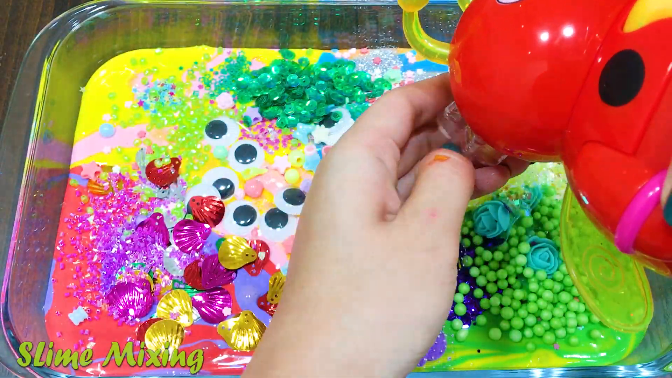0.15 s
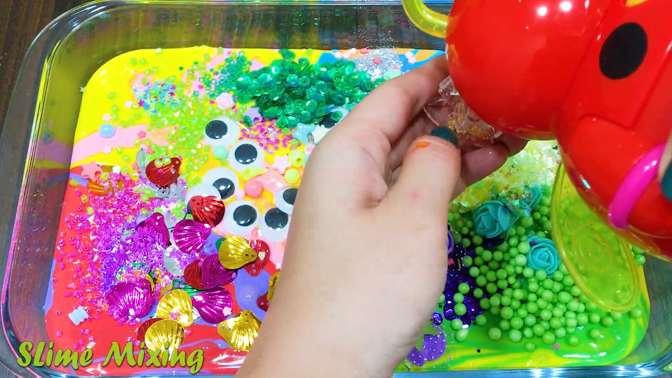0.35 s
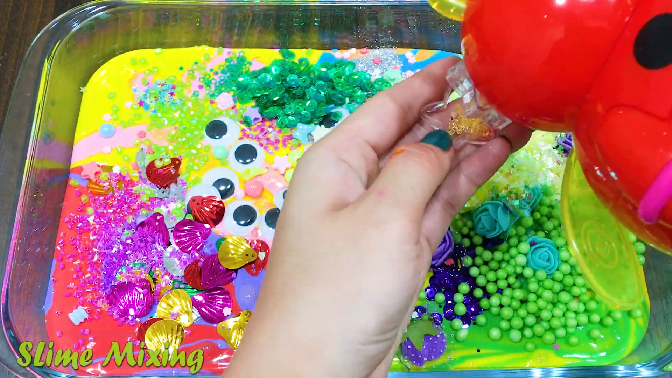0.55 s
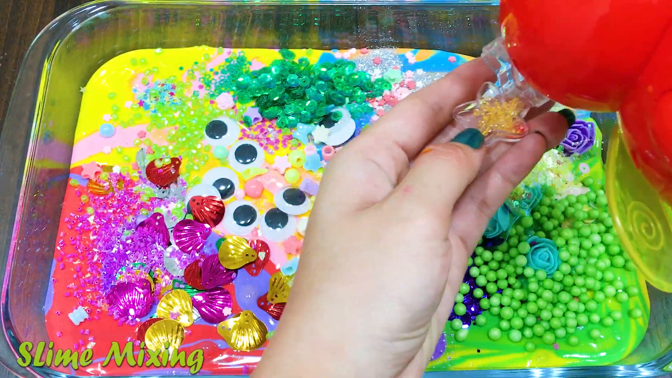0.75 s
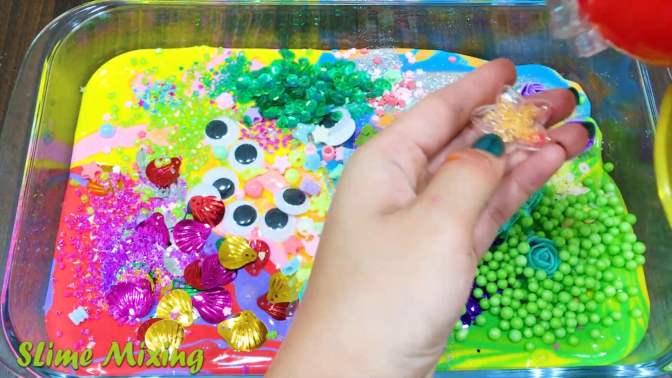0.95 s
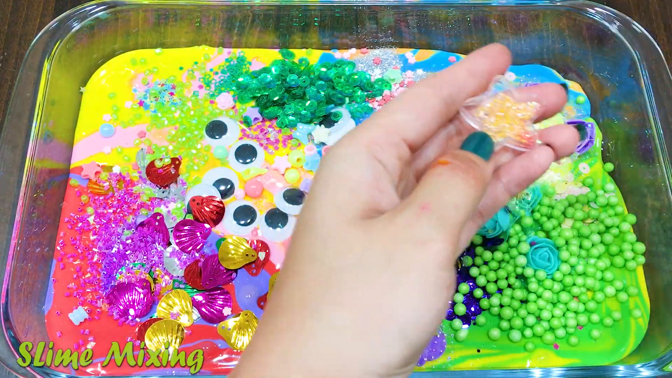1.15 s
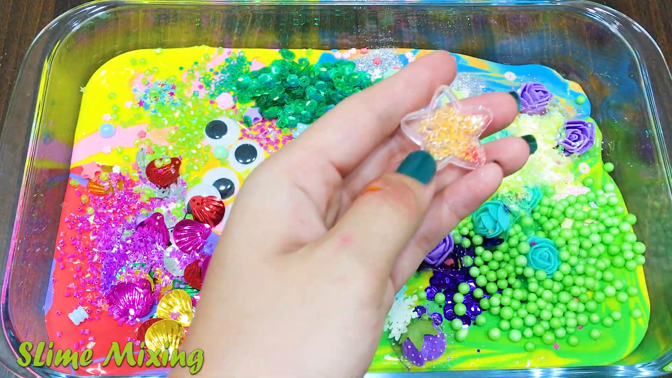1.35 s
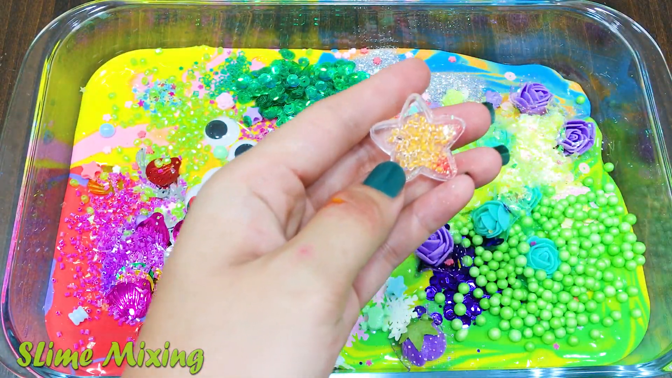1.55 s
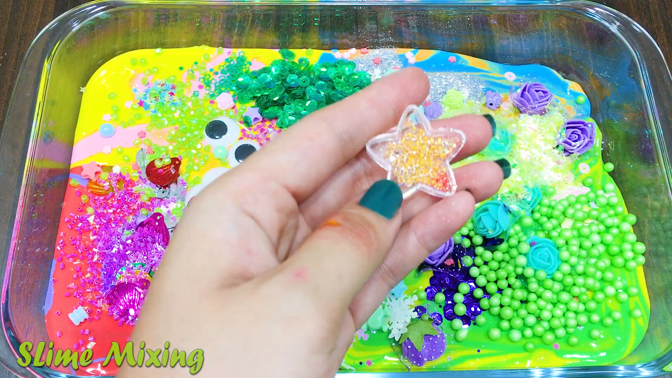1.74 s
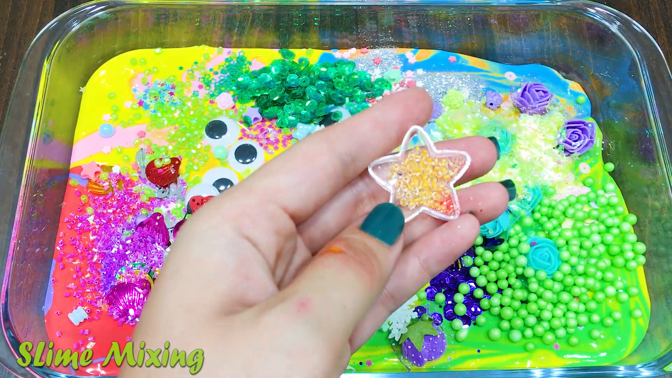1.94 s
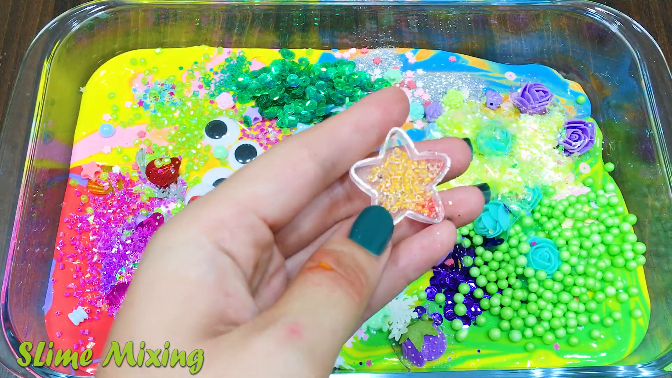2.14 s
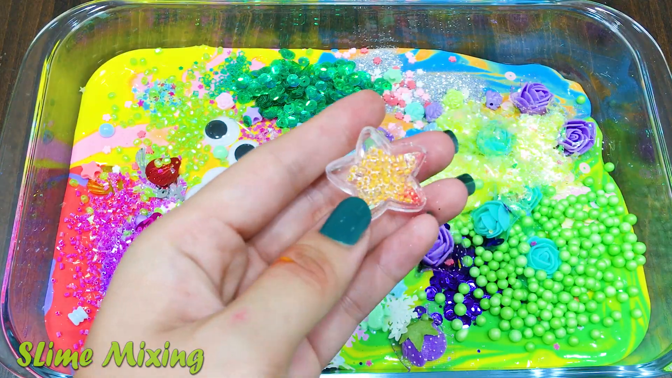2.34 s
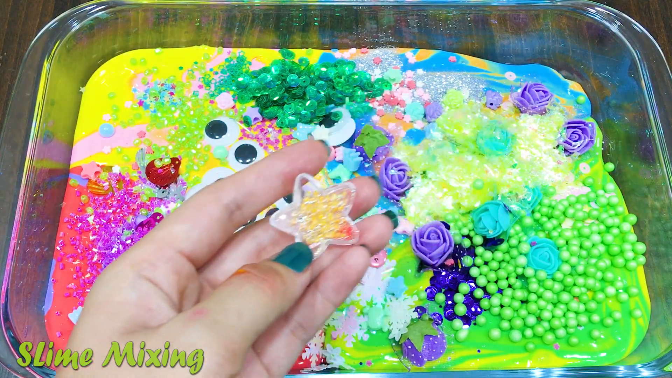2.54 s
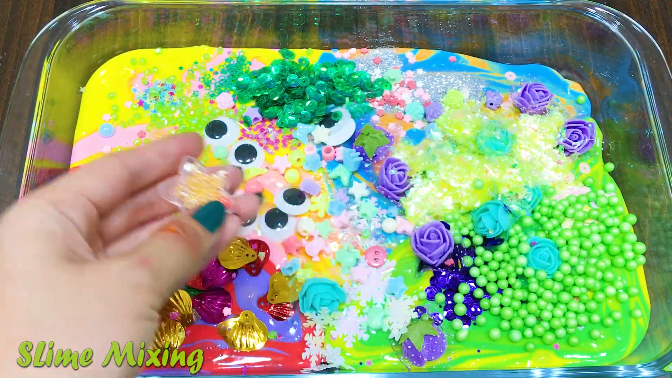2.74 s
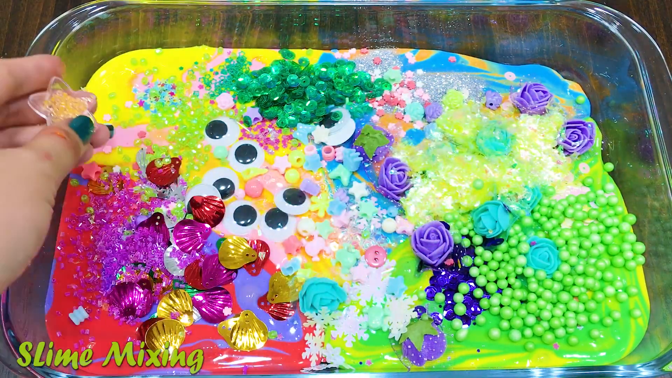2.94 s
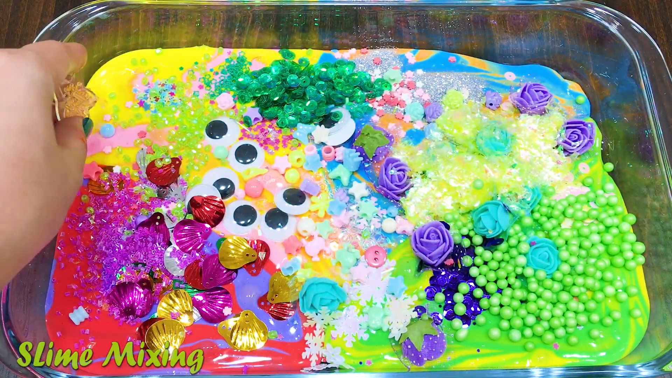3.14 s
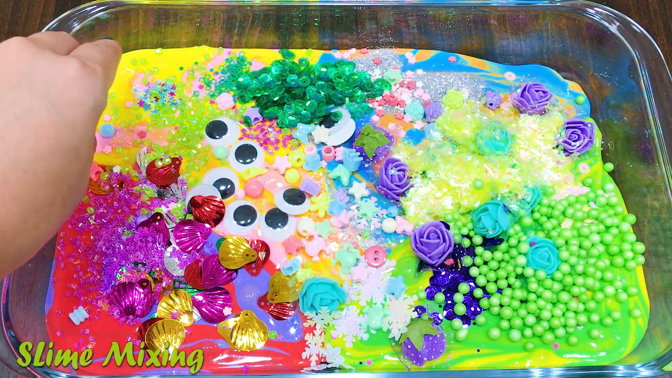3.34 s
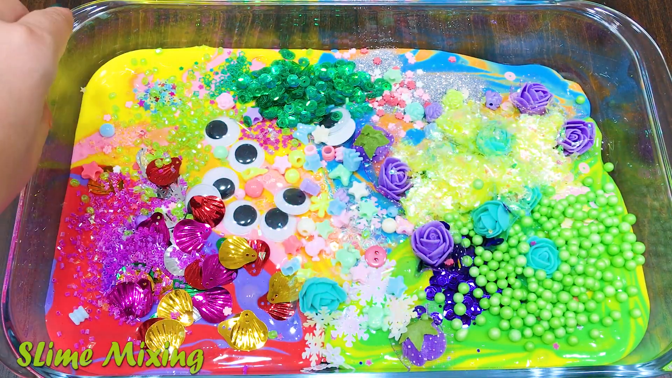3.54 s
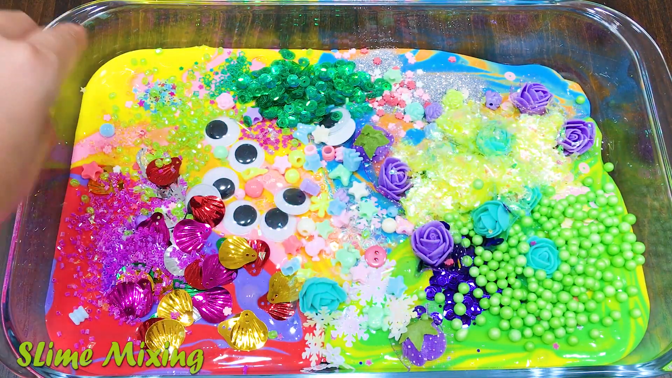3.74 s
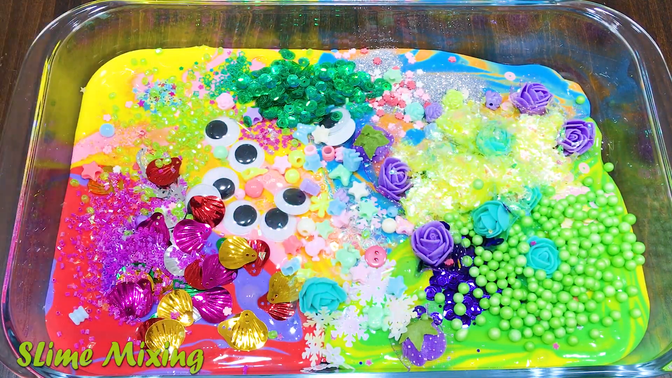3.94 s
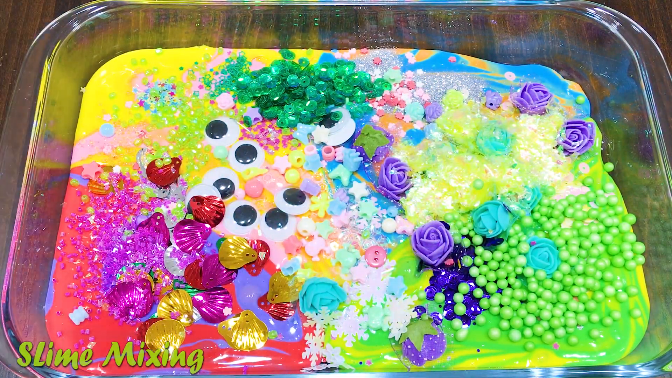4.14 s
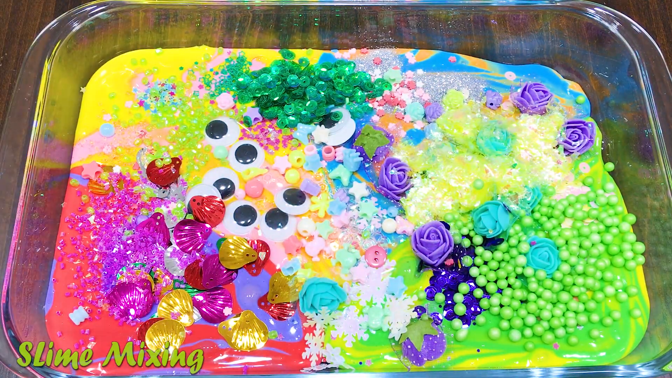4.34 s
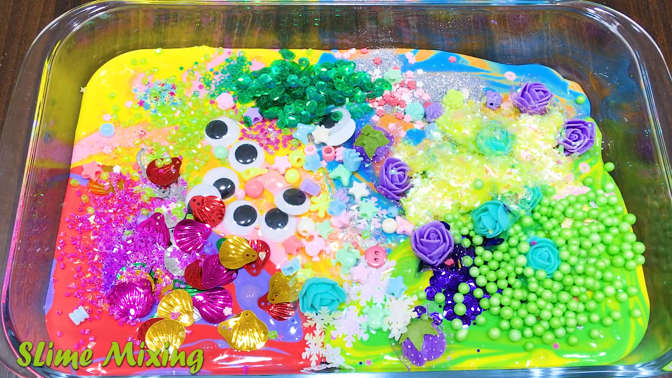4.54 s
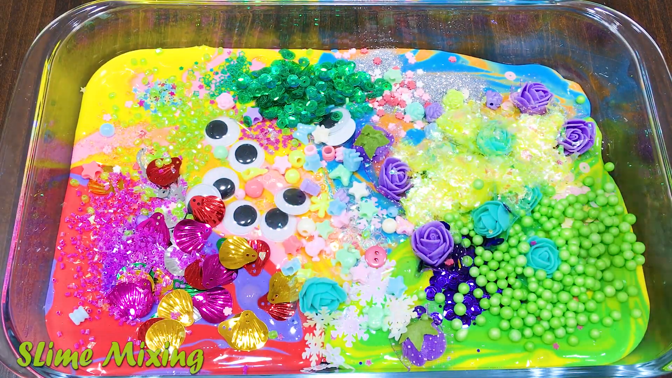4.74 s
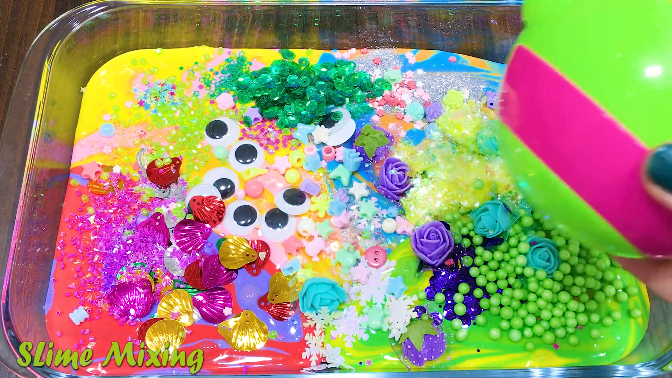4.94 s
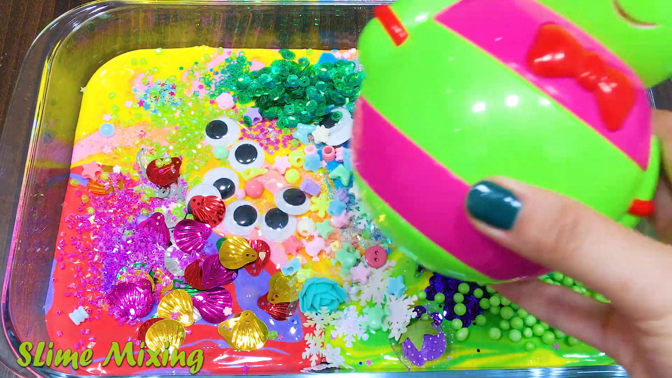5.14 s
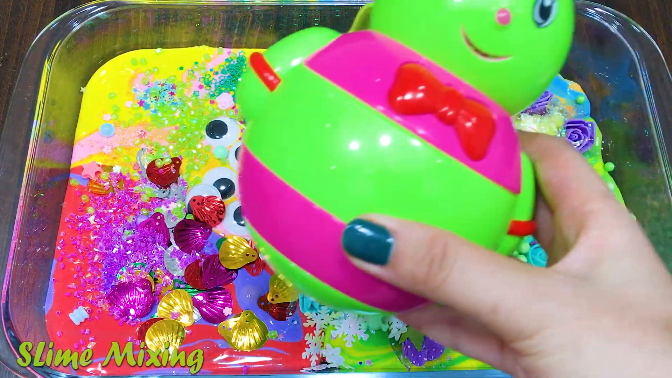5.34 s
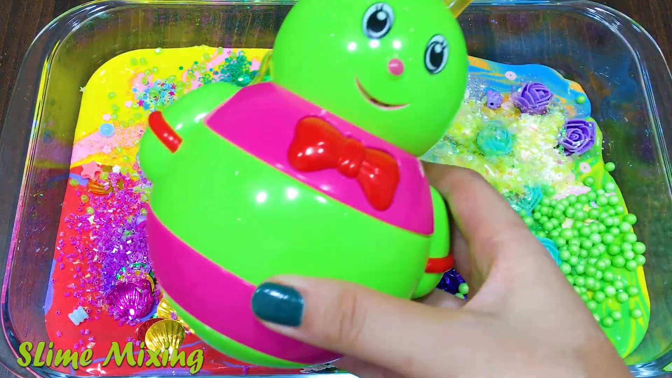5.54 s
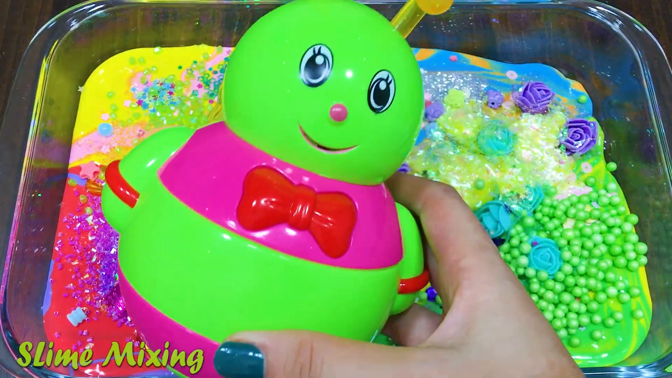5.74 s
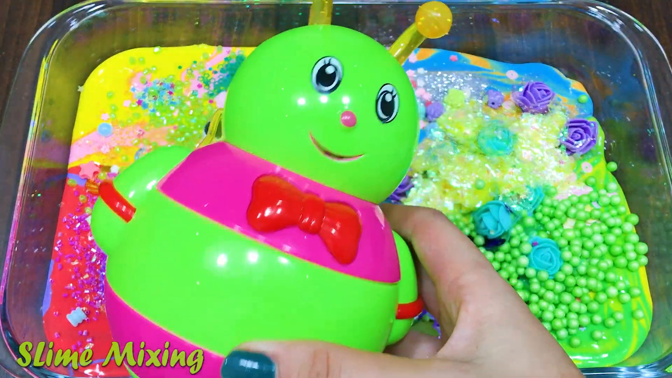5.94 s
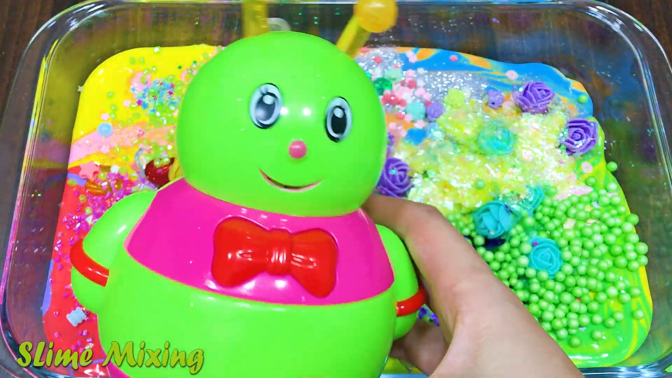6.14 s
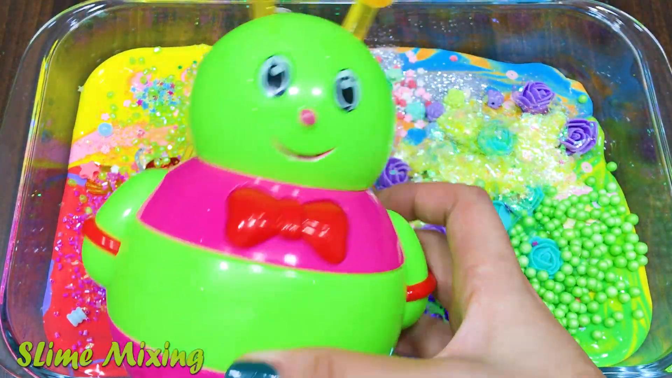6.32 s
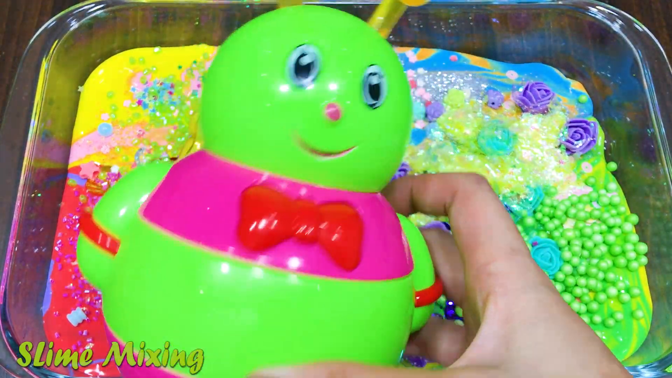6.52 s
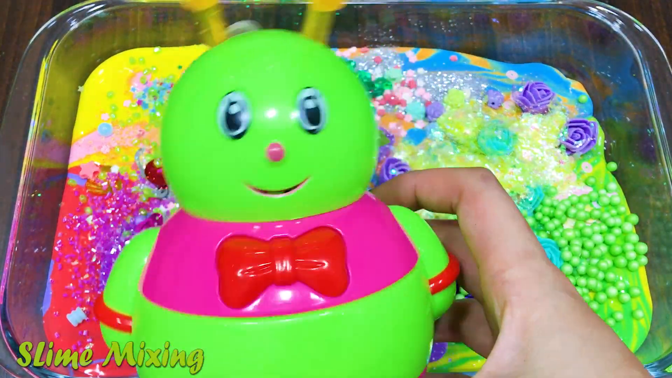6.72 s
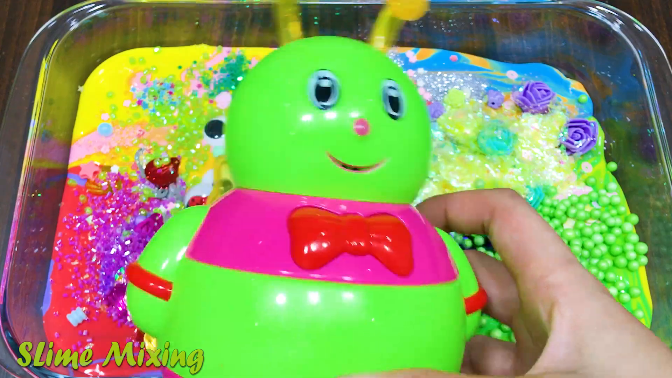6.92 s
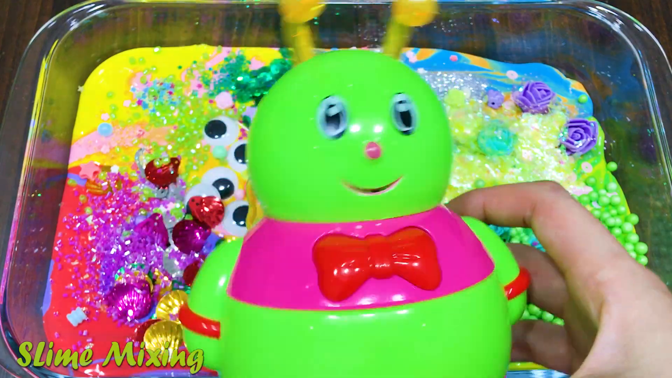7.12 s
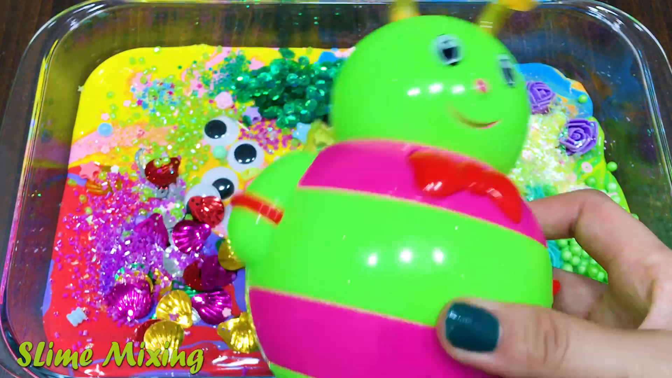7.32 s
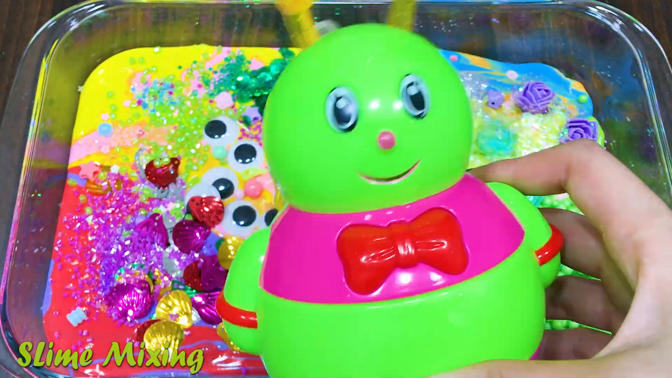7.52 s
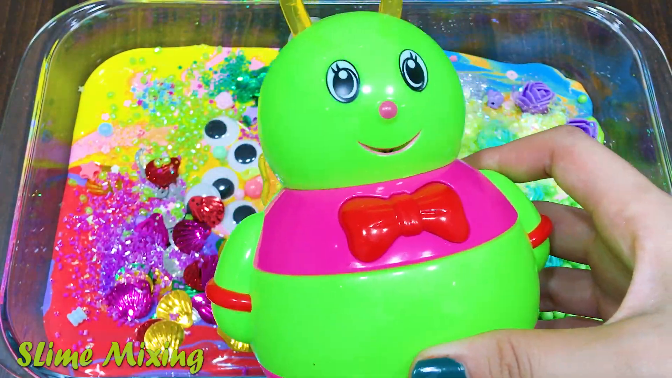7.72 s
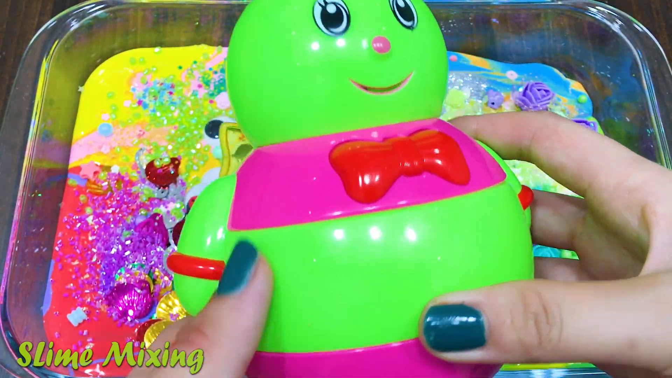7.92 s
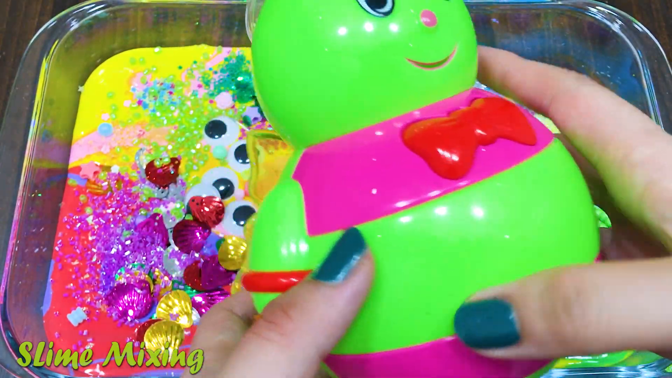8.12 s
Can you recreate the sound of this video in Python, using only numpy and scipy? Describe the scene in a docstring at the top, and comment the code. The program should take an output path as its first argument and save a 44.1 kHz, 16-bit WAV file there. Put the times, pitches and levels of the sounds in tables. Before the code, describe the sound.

Close indoor handling of plastic toys over slime: clicks and ticking beads, sparse bumps, a crinkly little box, clattering shells, then a loud hollow rattle.

```python
"""Plastic toys over slime

Hollow plastic toys are handled over a glass tray of slime, close by in a quiet room. A red toy clicks open,
beads plop and patter, the toy is put down, and a star-shaped box crackles; toys clack and a green one rattles.
Touches are noise bursts through resonant shells; patter, crackle and rubbing are streams of tiny impacts.
Slime thuds are falling sines, ringing parts are decaying sines, and diffuse reflections surround the toys."""
import sys
import numpy as np
from scipy import signal
from scipy.fft import rfft, irfft
from scipy.io import wavfile

SR = 44100
rng = np.random.default_rng(int(sys.argv[2]) if len(sys.argv) > 2 else 0)


def to_wav(sig):
    """Store sig (one row per channel, or 1-D mono) as 16-bit WAV at the path in sys.argv[1].

    Samples outside -1..1 are clipped; the rate is SR.
    """
    pcm = np.clip(np.atleast_2d(sig), -1, 1) * 32767
    pcm = np.round(pcm).astype(np.int16)
    wavfile.write(sys.argv[1], SR, pcm.T)  # frames by channels


N = 360297

# Touch levels below are set before the treble lift and dulling; the dB of colours and resonances are relative.
# Still air. Each row: frequency in Hz, relative level in dB per Hz.
AIR_COLOUR = [(15, -68), (25, -41), (55, -4.5), (130, -7.5), (161, -10.5), (285, -14), (695, -21.5),
              (796, -21), (1100, -26), (9840, -34.5), (12200, -33.5), (16000, -39)]
# Swell of the hum. Each row: time in seconds, RMS level in dB.
HUM_SWELL = [(0, -72), (3.2, -78), (3.7, -66.5), (4.6, -70), (6, -73.5), (7.6, -75), (7.9, -66.5)]
# Decay of the room. Each row: frequency in Hz, time to fall 60 dB in seconds.
ROOM_DECAY = [(200, .6), (1000, 0.93), (3000, 0.8), (7000, .5), (11000, .5), (16000, .3)]
# Strength of the reverberation. Each row: frequency in Hz, level in dB before each source's send.
ROOM_LEVEL = [(200, -9), (1000, 2), (3000, -6), (7000, -6), (11000, -10.5), (16000, -16)]

# Fingers rub the red toy. Each row: start in seconds, length in seconds, level in dB.
RED_RUBS = [(-.02, 0.21, -54), (.7, 0.011, -57.5), (1.23, 0.13, -56)]
# Hollow of the rubbed red toy. Each row: centre in Hz, half-width in Hz, relative level in dB.
RED_CAVITY = [(1506, 340, -6.5), (2830, 500, -8.5), (4870, 2050, 2.5)]
# The red toy's mouth clicks as the box is pried out.
# Each row: start in seconds, level in dB, time to the first rebound in seconds, number of touches.
RED_CLICKS = [(.0508, -43, 0.03, 2), (.0962, -40, 0, 1), (.1161, -32, 0.011, 3), (.1461, -29, 0, 1),
              (.1685, -30, 0, 1), (.2308, -34.5, .014, 2), (.253, -42, 0, 1)]
# The red toy is put down.
# Each row: start in seconds, level in dB, time to the first rebound in seconds, number of touches.
RED_BUMPS = [(1.2426, -40, .0088, 3), (1.2986, -43, .012, 2), (1.3439, -39.5, .0081, 2),
             (1.4308, -49, 0, 1), (1.4891, -31, .0175, 2), (1.6969, -48, 0, 1)]
# Broad colour of the red toy. Each row: frequency in Hz, relative level in dB per Hz.
RED_COLOUR = [(240, -66), (400, -29), (852, -35), (1460, -27), (2710, -14.5), (3020, -7), (3930, -12),
              (6440, 0), (10100, -16), (16000, -22)]
# Its shell as it clicks. Each row: frequency in Hz, width in Hz, dB added to the colour.
RED_CLICK_MODES = [(1503, 110, 10), (3580, 430, -17), (6000, 720, 0), (7000, 440, 3), (7700, 310, 2)]
# Its shell as it is put down. Each row: frequency in Hz, width in Hz, dB added to the colour.
RED_BUMP_MODES = [(1570, 180, 5.4), (2150, 480, 4), (3500, 380, 0.96), (4500, 570, 2.7), (6260, 340, 2.3),
                  (8800, 900, 3.6)]

# Soft landings in the slime. Each row: start in seconds, thud level in dB, final pitch in Hz, splat level in dB.
LANDINGS = [(0.059, -44.5, 206, -47), (.312, -41, 68, -32.5), (0.882, -72, 302.5, -57.5),
            (0.968, -56.5, 278, -62.5), (1.162, -53.5, 260, -62), (6.07, -56, 152, -54)]
# Colour of the splat. Each row: frequency in Hz, relative level in dB per Hz.
SPLAT_COLOUR = [(150, -10), (400, -6), (900, -3.5), (1800, 4), (3000, -5), (7000, -14.5), (16000, -12)]

# Spills of beads. Each row: start in seconds, length in seconds, level in dB.
BEAD_SPILLS = [(.335, 0.053, -45.5), (.445, .025, -48), (.68, 0.14, -58), (.81, 0.17, -53),
               (1.08, 0.14, -65)]
# Beads that land hard. Each row: start in seconds, level in dB.
HARD_BEADS = [(.3817, -39), (.3905, -54), (.4012, -42), (.4127, -41.5), (.7301, -61), (.8696, -51),
              (.9552, -49), (1.1021, -52.5)]
# Colour of the beads. Each row: frequency in Hz, relative level in dB per Hz.
BEAD_COLOUR = [(2500, -32), (7000, -22), (9500, -16), (11600, -5), (13500, -13.5), (16000, -15)]

# Sharp snaps of the star box. Each row: start in seconds, level in dB.
BOX_SNAPS = [(2.7184, -61), (3.3169, -53), (3.3283, -39), (3.3748, -52), (3.3983, -50), (3.4366, -45.5),
             (3.4907, -40.5), (3.5114, -51), (3.556, -41.5)]
# Fingers squeeze the star box. Each row: start in seconds, length in seconds, level in dB.
BOX_SQUEEZES = [(3.16, 0.17, -58.5), (3.3, .31, -56), (4.535, 0.028, -53)]
# The star box slides. Each row: start in seconds, length in seconds, level in dB.
BOX_SLIDES = [(3.31, .32, -65)]
# Broad colour of the box. Each row: frequency in Hz, relative level in dB per Hz.
BOX_COLOUR = [(710, -45), (1200, -16), (1830, -24.5), (3400, -10.5), (3660, -17), (4220, -9), (6230, -10.5),
              (8170, 0), (10100, -3), (12500, 1), (16000, -2.5)]
# Shell of the box. Each row: frequency in Hz, width in Hz, dB added to the colour.
BOX_MODES = [(2000, 1000, 13), (3500, 250, 3.5), (5720, 170, 2.6)]
# Hollow of the sliding box. Each row: centre in Hz, half-width in Hz, relative level in dB.
BOX_CAVITY = [(700, 127, -0.8), (1950, 300, 0.35)]

# Toys clack together as the green one is picked out. Each row: start in seconds, level in dB.
TOY_CLACKS = [(4.2866, -43.5), (4.3336, -41.5), (4.3683, -36.5), (4.653, -35), (4.6781, -21.5),
              (4.6921, -31.5), (4.7126, -33), (4.7277, -28.5), (4.7545, -39), (4.7651, -26.5),
              (4.8605, -29), (4.8828, -30.5), (4.8957, -31.5)]
# Colour of shell on shell. Each row: frequency in Hz, relative level in dB per Hz.
CLACK_COLOUR = [(350, -64), (600, -33), (1830, -19.5), (2680, -14), (3430, -5), (3730, -13.5), (5050, -4),
                (6550, -1), (7830, 0), (16000, -17)]
# Resonances of shell on shell. Each row: frequency in Hz, width in Hz, dB added to the colour.
CLACK_MODES = [(1950, 230, 6), (4090, 320, 8), (4700, 260, 8), (7850, 450, 4.5)]

# Fingers rub the green toy. Each row: start in seconds, length in seconds, level in dB.
GREEN_RUBS = [(4.9, 0.19, -61.5), (5.64, .2, -66)]
# Hollow of the rubbed green toy. Each row: centre in Hz, half-width in Hz, relative level in dB.
GREEN_CAVITY = [(2070, 210, -1), (2330, 120, -6)]
# Single knocks as the green toy is lifted and turned. Each row: start in seconds, level in dB.
GREEN_HANDLING = [(4.9827, -38.5), (5.067, -36.5), (5.077, -34), (5.1107, -32.5), (5.1278, -26.5),
                  (5.3685, -50.5), (5.669, -43.5), (5.6914, -33), (5.818, -47.5), (5.8813, -37),
                  (6.1295, -47), (6.149, -35), (6.2267, -43.5), (6.246, -41), (6.273, -34.5), (7.8766, -35),
                  (7.988, -42), (8.0755, -46.5)]
# Shaking throws the loose parts against the shell.
# Each row: start in seconds, level in dB, time to the first rebound in seconds, number of touches.
GREEN_THROWS = [(6.2922, -29.5, .0105, 4), (6.3454, -29.5, .0176, 2), (6.401, -31.5, .009, 2),
                (6.462, -27.5, 0, 1), (6.479, -27, .0137, 3), (6.5518, -27.5, .0036, 2),
                (6.6293, -29.5, .0122, 2), (6.6823, -28, .0165, 3), (6.7269, -27.5, .0221, 2),
                (6.8289, -31.5, 0, 1), (6.843, -25, .0157, 3), (6.9091, -25.5, .0036, 2),
                (6.9289, -28.5, .025, 2), (6.9796, -24, .0211, 2), (7.033, -26.5, .01, 2),
                (7.1097, -23, .007, 2), (7.172, -26, .014, 3), (7.2432, -23, .0225, 3),
                (7.3053, -29.5, .011, 2), (7.3841, -22.5, 0, 1), (7.4228, -26, .0116, 3),
                (7.5071, -21.5, .0135, 3), (7.5465, -25.5, .018, 2), (7.5765, -23, .0033, 2),
                (7.6276, -22.5, .0095, 2), (7.6542, -22, .008, 2), (7.6871, -22.5, .019, 3),
                (7.7513, -27.5, .0217, 2), (7.7928, -26, 0, 1)]
# Vigour of the shaking, before the chatter trim. Each row: time in seconds, level in dB.
SHAKE_VIGOUR = [(6.1, -73), (6.18, -64), (6.46, -42.5), (6.78, -37.5), (7.06, -29.5), (7.6, -30.5),
                (7.67, -27), (7.95, -57), (8.15, -59.5)]
# Broad colour of the green toy. Each row: frequency in Hz, relative level in dB per Hz.
GREEN_COLOUR = [(210, -46.5), (350, -31), (1680, -14.5), (2000, -8), (2630, -11.5), (2800, -7), (4180, -4),
                (5220, 2.5), (8710, 3), (16000, -11)]
# Shell of the green toy. Each row: frequency in Hz, width in Hz, dB added to the colour.
GREEN_MODES = [(1233, 88, 9), (1997, 66, 5.5), (2410, 180, 7.5), (3100, 850, -2.5), (4480, 71, 6),
               (5240, 38, 5.5), (7170, 290, 2.5), (7480, 270, 0), (8170, 510, 1.5), (10100, 140, 1),
               (15200, 2400, 4.5)]
# Tones of the green toy's parts. Each row: frequency in Hz, level in dB relative to a firm knock,
# time to fall 60 dB in seconds, dB gained per dB of a harder knock, level in dB of a flick of 0 dB.
PART_TONES = [(2787, -22, 0.15, 1.7, -41), (2847, -20, 0.2, 1.8, -39), (3403, -5.5, 0.034, 6.5, -77),
              (6570, -52, 0.13, 3.5, -39)]
# The springy part is flicked directly. Each row: start in seconds, strength in dB.
PART_FLICKS = [(5.129, -2), (5.881, -14.5), (6.147, -19)]
# Sizzle of the flicked part. Each row: frequency in Hz, relative level in dB per Hz.
SIZZLE_COLOUR = [(2000, -51), (5500, -26), (6600, 7), (7600, -11), (9300, -1.5), (10200, -33), (16000, -18)]

AIR_DB, HUM_HZ = -66, 131.6
CHATTER_DB = -7.5       # trim of the light touches against the vigour
FIRM_KNOCK_DB = -22     # reference knock for the ringing parts
REBOUND_SHARE = .75     # each rebound takes this share of the time of the one before
CONTACT_S = .0045       # a touch's level is its RMS as if spread over this time
CUTOFF_HZ = 15800
SIZE = 4096             # samples in a short sound
GRID_HZ = np.maximum(np.arange(SIZE // 2 + 1) * SR / SIZE, 1)
AGE = np.arange(SIZE) / SR
TIME = np.arange(N) / SR


def from_db(db):
    """Turn decibels into an amplitude factor."""
    return 10 ** (np.asarray(db) / 20)


def rms_one(x):
    """Scale a sound to an RMS of one."""
    return x / np.sqrt(np.mean(x ** 2) + 1e-20)


def at_hz(points, hz):
    """Read a table on a log-frequency axis."""
    table = np.array(points)
    return np.interp(np.log(hz), np.log(table[:, 0]), table[:, 1])


def in_time(rows):
    """Read a level curve at every sample."""
    s, level = np.transpose(rows)
    return np.interp(TIME, s, level)


def add(out, s, sound):
    """Mix a short sound in at time s."""
    at = max(round(s * SR), 0)
    out[at:at + len(sound)] += sound[:N - at]


def through(x, response):
    """Pass a sound through a body or room, keeping its length."""
    return signal.fftconvolve(x, response)[:len(x)]


def band_of(x, low, high):
    """Keep only the band between two frequencies in Hz."""
    return signal.sosfilt(signal.butter(2, [low, high], "band", fs=SR, output="sos"), x)


def body_db(colour, resonances=()):
    """A body's gain by frequency: a broad colour with resonances laid over it."""
    gain_db = at_hz(colour, GRID_HZ)
    for hz, width, db in resonances:
        gain_db = gain_db + db / (1 + (2 * (GRID_HZ - hz) / width) ** 2)
    return gain_db


def impulse(gain_db):
    """The causal (minimum-phase) response that has these gains."""
    cepstrum = irfft(np.log(from_db(gain_db)))
    cepstrum[1:SIZE // 2] *= 2
    cepstrum[SIZE // 2 + 1:] = 0
    return irfft(np.exp(rfft(cepstrum)))


def contact(gain_db, grind_s, skid_db, skid_s, lift_db=0):
    """One touch: a brief burst of micro-impacts and a weaker skid, sounding through a body."""
    phase = AGE / (grind_s * from_db(rng.normal(0, 1.5)))   # no two bursts last equally long
    burst = phase ** .5 * np.exp(-phase ** 2)
    skid = from_db(skid_db) * np.exp(-AGE / skid_s)
    force = rng.standard_normal(SIZE) * (burst + skid)
    energy = np.mean(np.abs(rfft(force) * from_db(gain_db)) ** 2)   # leaves the lift out
    return through(force, impulse(gain_db + lift_db)) / np.sqrt(energy / (CONTACT_S * SR))


def knocks(rows, gain_db, grind_s, skid_db, skid_s, treble_db, firm_db, dulling):
    """Touches that dull the further they fall below a firm one: the direct sound, and the room's share."""
    direct, spread = np.zeros((2, N))
    treble = 1 / (1 + (8000 / GRID_HZ) ** 6)
    modes_hz = np.arange(0, SR / 2, 350)
    unit = np.sqrt(CONTACT_S * SR / np.mean(from_db(gain_db) ** 2))
    for s, level_db in rows:
        lift_db = (treble_db - dulling * max(firm_db - level_db, 0)) * treble
        # each spot struck aims other modes at the microphone; the room's share keeps the even colour
        spot_db = np.interp(GRID_HZ, modes_hz, rng.normal(0, 3.5, len(modes_hz)))
        touch = contact(gain_db + spot_db, grind_s, skid_db, skid_s, lift_db)
        add(direct, s, from_db(level_db) * touch)
        add(spread, s, from_db(level_db) * unit * impulse(gain_db + lift_db))
    return np.array([direct, spread])


def rebounds(rows, loss_db):
    """Each blow bounces, every gap shorter and touch weaker than the last; gives (s, dB) of all touches."""
    touches = []
    for s, db, gap, count in rows:
        for k in range(count):
            delay = gap * sum(REBOUND_SHARE ** j for j in range(k))
            touches.append((s + delay, db - loss_db * k))
    return touches


def grains(per_s, spread_db):
    """Tiny impacts at random moments, most weak and a few strong."""
    sizes = from_db(spread_db * np.minimum(rng.exponential(1, N), 3.5))
    signs = rng.choice([-1, 1], N)
    return sizes * signs * (rng.random(N) < per_s / SR)


def gestures(rows, attack_s, release_s):
    """Gain of hand movements that swell, hold and die away."""
    gain = np.zeros(N)
    for s, length, db in rows:
        swell = np.clip((TIME - s) / attack_s, 0, 1)
        release = np.exp(-np.maximum(TIME - s - length, 0) / release_s)
        gain += from_db(db) * swell * release
    return gain


def rub(gain, resonances):
    """A stream of tiny slips sounds a hollow body's resonances."""
    slips = grains(per_s=1500, spread_db=3) + 1e-18
    rings = sum(from_db(db) * rms_one(band_of(slips, hz - width, hz + width)) for hz, width, db in resonances)
    return gain * rms_one(rings)


def background():
    """Still room air is coloured noise; a faint hum is a sine with slowly wavering phase."""
    hz = np.maximum(np.arange(N // 2 + 1) * SR / N, 1)
    air = irfft(rfft(rng.standard_normal(N)) * from_db(at_hz(AIR_COLOUR, hz)), N)
    waver = rms_one(irfft(rfft(rng.standard_normal(N)) / (1 + (hz / 2) ** 2), N))
    hum = np.sqrt(2) * np.sin(2 * np.pi * HUM_HZ * TIME + 1.7 * waver)
    return from_db(AIR_DB) * rms_one(air) + from_db(in_time(HUM_SWELL)) * hum


def room_response(gap_s=0.00088):
    """Diffuse reflections begin after a short gap and die band by band."""
    age, response = TIME[:SR], np.zeros(SR)
    edges = np.geomspace(100, 18000, 14)
    for low, high in zip(edges, edges[1:]):
        hz = np.sqrt(low * high)
        band = band_of(rng.standard_normal(SR), low, high)
        fade = from_db(-60 * age / at_hz(ROOM_DECAY, hz)) * np.clip(age / gap_s - 1, 0, 1)
        response += from_db(at_hz(ROOM_LEVEL, hz)) * band * fade / np.sqrt(np.sum(fade ** 2))
    return response


def room(x, count=2):
    """The toys keep moving, so the sound crossfades in turn between different sets of reflections."""
    place = TIME / .023   # seconds from one set to the next
    out = np.zeros(N)
    for k in range(count):
        nearness = np.clip(1 - np.abs((place - k) % count - 1), 0, 1)
        out += through(x * np.sin(np.pi / 2 * nearness), room_response())
    return out


def red_toy():
    """Stiff, dull clicks of a thick shell, fingers rubbing on it, and its bumps on the table."""
    clicks = knocks(rebounds(RED_CLICKS, loss_db=2), body_db(RED_COLOUR, RED_CLICK_MODES),
                    grind_s=0.0031, skid_db=-21, skid_s=0.0042, treble_db=1.0, firm_db=-38, dulling=.7)
    bumps = knocks(rebounds(RED_BUMPS, loss_db=0.5), body_db(RED_COLOUR, RED_BUMP_MODES),
                   grind_s=0.0018, skid_db=-21, skid_s=0.003, treble_db=0, firm_db=-37, dulling=2.3)
    rubbing = rub(gestures(RED_RUBS, attack_s=0.02, release_s=0.0074), RED_CAVITY)
    return clicks + bumps + rubbing


def plops(drop_hz=600, fall_s=0.0021, fade_cycles=0.61):
    """A landing splats, and the yielding slime gives a short thud that drops in pitch."""
    out = np.zeros(N)
    for s, level_db, end_hz, splat_db in LANDINGS:
        pitch = end_hz + drop_hz * np.exp(-AGE / fall_s)
        cycles = np.cumsum(pitch) / SR
        decay = AGE * (end_hz + 60) / fade_cycles
        thud = decay * np.exp(1 - decay) * np.sin(2 * np.pi * cycles)
        splat = contact(body_db(SPLAT_COLOUR), grind_s=0.0072, skid_db=-7.0, skid_s=.012)
        add(out, s, from_db(level_db) * thud)
        add(out, s, from_db(splat_db) * splat)
    return out


def beads():
    """Tiny beads land with very short, high ticks, singly or in a dense patter."""
    colour = body_db(BEAD_COLOUR)
    ticks = knocks(HARD_BEADS, colour, grind_s=0.00039, skid_db=-38, skid_s=0.0041,
                   treble_db=9, firm_db=-40.5, dulling=0.61)
    patter = rms_one(through(grains(per_s=410, spread_db=4.5), impulse(colour)))
    return ticks + gestures(BEAD_SPILLS, attack_s=0.026, release_s=0.0087) * patter


def star_box():
    """The little box snaps and crackles under the fingers and sounds hollow as it slides."""
    colour = body_db(BOX_COLOUR, BOX_MODES)
    snaps = knocks(BOX_SNAPS, colour, grind_s=0.00028, skid_db=-14.0, skid_s=0.005,
                   treble_db=-0.5, firm_db=-45, dulling=0)
    crackle = rms_one(through(grains(per_s=290, spread_db=3), impulse(colour)))
    squeeze = gestures(BOX_SQUEEZES, attack_s=0.0084, release_s=0.034)
    slide = rub(gestures(BOX_SLIDES, attack_s=0.07, release_s=0.02), BOX_CAVITY)
    return snaps + squeeze * crackle + slide


def clacks():
    """Hard shells bump into one another: very short bursts with a strong skid."""
    return knocks(TOY_CLACKS, body_db(CLACK_COLOUR, CLACK_MODES), grind_s=0.00069, skid_db=-4.5, skid_s=0.0035,
                  treble_db=3.0, firm_db=-29.5, dulling=3.3)


def green_toy():
    """Loose parts knock, ring and chatter in a thin shell while fingers shift their grip."""
    shell = body_db(GREEN_COLOUR, GREEN_MODES)
    touches = GREEN_HANDLING + rebounds(GREEN_THROWS, loss_db=1.0)
    hits = knocks(touches, shell, grind_s=0.002, skid_db=-13.5, skid_s=0.0053,
                  treble_db=1.0, firm_db=-25, dulling=1.5)
    light = np.zeros(N)
    for _ in range(4):   # four kinds of light touch
        touch = contact(shell, grind_s=0.0024, skid_db=-19, skid_s=0.0043)
        light += through(grains(per_s=22, spread_db=3), touch)
    chatter = from_db(in_time(SHAKE_VIGOUR) + CHATTER_DB) * rms_one(light)
    rubbing = rub(gestures(GREEN_RUBS, attack_s=0.011, release_s=0.016), GREEN_CAVITY)
    return hits + ringing_parts(touches) + chatter + rubbing


def ringing_parts(touches, sizzle_db=-41, sizzle_s=0.058):
    """Knocks of the green toy feed decaying tones, some mainly when hard; a flick also sizzles."""
    out, age = np.zeros(N), TIME[:SR // 3]
    for hz, level_db, t60, growth, flick_db in PART_TONES:
        blows = [(s, level_db + FIRM_KNOCK_DB + growth * (db - FIRM_KNOCK_DB)) for s, db in touches]
        flicks = [(s, flick_db + db) for s, db in PART_FLICKS]
        fade = from_db(-60 * age / t60)
        for s, db in blows + flicks:
            pitch = hz * (1 + rng.normal(0, .009))
            add(out, s, from_db(db) * fade * np.sin(2 * np.pi * pitch * age))
    for s, db in PART_FLICKS:
        buzz = rms_one(through(rng.standard_normal(len(age)), impulse(body_db(SIZZLE_COLOUR))))
        add(out, s, from_db(sizzle_db + db) * buzz * np.exp(-age / sizzle_s))
    return out


def scene():
    """Toys, beads and slime are heard directly and through the room, over the background."""
    red, landings, ticks = red_toy(), plops(), beads() + star_box()
    clack, green = clacks(), green_toy()
    direct = (red + landings + ticks + clack + green)[0]
    # how much of each source is sent to the room
    sends = (from_db(-1.5) * red + from_db(-10.5) * landings + from_db(-1.5) * ticks
             + from_db(0.5) * clack + from_db(-0.5) * green)
    return (direct + room(sends[1]) + background())[None]


def record(dry):
    """The microphone loses the deepest bass, and the top is cut steeply."""
    thinned = signal.sosfilt(signal.butter(2, 32, "high", fs=SR, output="sos"), dry)
    return signal.sosfilt(signal.ellip(10, .2, 70, CUTOFF_HZ, fs=SR, output="sos"), thinned)


dry = scene()
out = record(dry)
to_wav(out)
```